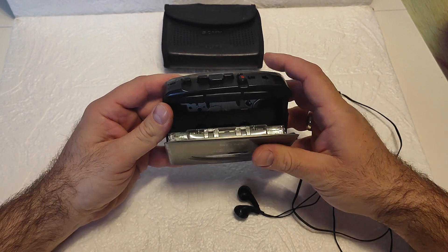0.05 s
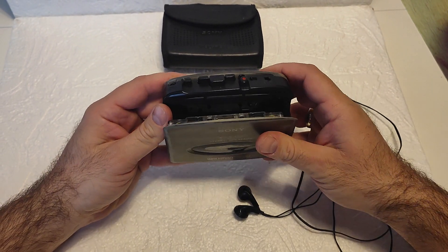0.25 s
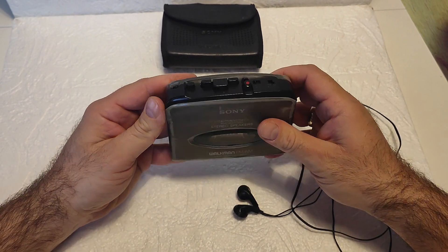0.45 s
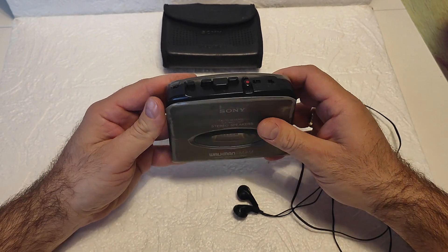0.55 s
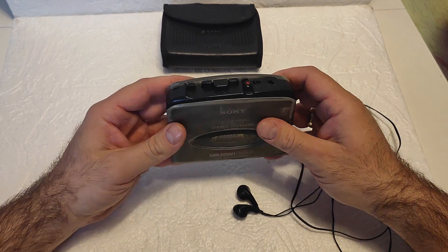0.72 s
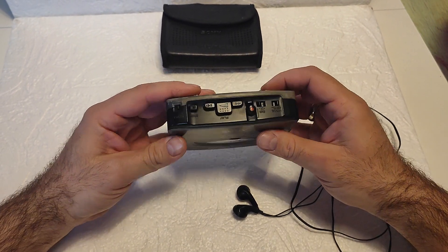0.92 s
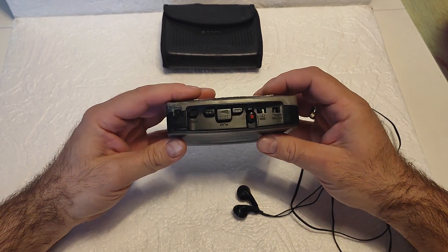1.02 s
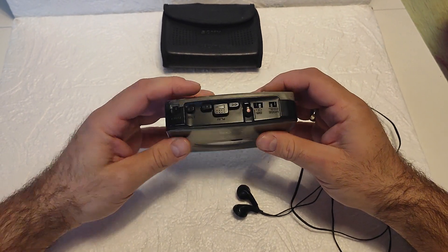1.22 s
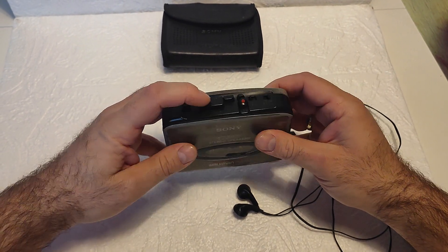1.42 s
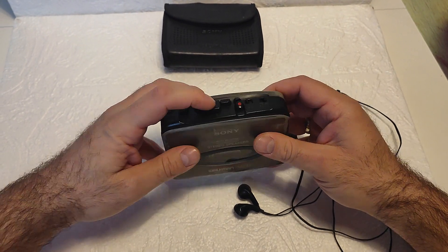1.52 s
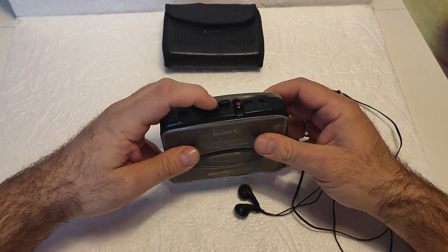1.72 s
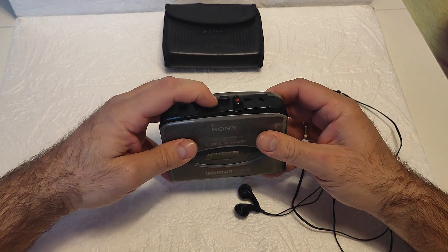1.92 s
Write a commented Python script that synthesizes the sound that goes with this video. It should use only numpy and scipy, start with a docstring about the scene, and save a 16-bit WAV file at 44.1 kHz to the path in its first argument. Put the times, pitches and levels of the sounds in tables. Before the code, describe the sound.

A portable cassette player is closed by hand: a double plastic clack, a short scrape, then a louder latch snap, followed by faint finger rubbing and small taps, close to the microphone in a small room.

```python
"""Closing a cassette player

Hands shut the door of a portable cassette player over a cloth-covered table, close to the microphone.
The cassette knocks into its seat, the door catches and the latch snaps: bursts of noise crack the
plastic shell and fading tones ring its parts. Rough noise makes the scrapes and the finger slides,
and short contacts make the finger taps. A small room answers, over a low steady background."""
import sys
import numpy as np
from scipy import signal
from scipy.fft import rfft, irfft, next_fast_len
from scipy.io import wavfile

SR = 44100
rng = np.random.default_rng(int(sys.argv[2]) if len(sys.argv) > 2 else 0)


def dump_mix(stems):
    """Bounce the given channels to the path in sys.argv[1] as a 16-bit WAV at rate SR."""
    frames = np.atleast_2d(stems).T  # one column per channel
    limited = np.clip(frames, -1, 1)  # hard clip at full scale
    pcm = np.round(limited * 32767).astype(np.int16)
    wavfile.write(sys.argv[1], SR, pcm)


N = 85995  # length in samples


def undb(db):
    """Turn decibels into a gain."""
    return 10 ** (np.asarray(db) / 20)


def along(table, hz):
    """Read a table of (f/Hz, value) points, joined by straight lines on a log-frequency axis."""
    f, v = np.array(table, float).T
    return np.interp(np.log(hz + 1), np.log(f), v)


def shape(x, gain):
    """Filter by a gain given as a function of frequency."""
    size = next_fast_len(2 * x.shape[-1])
    spectrum = rfft(x, size) * gain(np.fft.rfftfreq(size, 1 / SR))
    return irfft(spectrum, size)[..., :x.shape[-1]]


def colour(x, table):
    """Filter to (f/Hz, level/dB) points with minimum phase, so nothing sounds before its cause."""
    size = 4096
    gain = undb(along(table, np.fft.rfftfreq(size, 1 / SR)))
    # folding the cepstrum (the spectrum of the log gain) onto positive times gives minimum phase
    cepstrum = irfft(np.log(gain))
    cepstrum[1:size // 2] *= 2
    cepstrum[size // 2 + 1:] = 0
    response = irfft(np.exp(rfft(cepstrum)))
    return signal.fftconvolve(x, response[None], axes=1)[:, :x.shape[1]]


def on_left(x, table):
    """Colour the left side only."""
    return np.vstack([colour(x[:1], table), x[1:]])


ALIKE_HZ = 1658  # around here the two sides stop being alike


def pair(size):
    """Stereo noise: alike on both sides in the bass, unrelated in the treble."""
    own, shared = rng.standard_normal((2, size))

    def alike(f):
        return 1 / (1 + (f / ALIKE_HZ) ** 2 / 2)

    def unlike(f):
        return np.sqrt(1 - alike(f) ** 2)

    left = shape(shared, alike) + shape(own, unlike)
    return np.array([left, shared])


def flutter(step_s):
    """A random value every step, joined by straight lines."""
    return np.interp(np.arange(N) / SR / step_s, np.arange(N), rng.standard_normal(N))


def ringing(blows, modes):
    """Every blow starts all the modes (natural tones) of a part; each dies at its own rate."""
    out = np.zeros(N)
    for at, db in blows:
        start = int(at * SR)
        t = np.arange(N - start) / SR
        for hz, mode_db, t60 in modes:
            tone = np.cos(2 * np.pi * hz * t)
            decay = np.exp(-np.log(1000) * t / t60)  # falls 60 dB in t60 seconds
            soft_start = (1 - np.exp(-t * hz)) ** 2
            out[start:] += undb(db + mode_db) * tone * decay * soft_start
    return out


# steady background noise: f/Hz, level/dB
BACKGROUND = [(20, -64), (45, -51), (100, -45.5), (140, -48.5), (215, -44), (300, -52), (450, -51.5),
              (1000, -58.5), (2500, -62), (4800, -56.5), (7000, -71), (15000, -66.5)]
# low rumble, unrelated left and right: f/Hz, level/dB
RUMBLE = [(20, -57), (45, -47), (100, -48), (200, -57.5), (600, -84)]
# how the background differs on the left side: f/Hz, level/dB
BACKGROUND_LEFT = [(100, 4.5), (500, 1.5), (1500, -2), (3500, -5.5), (5000, -11), (6400, -23.5),
                   (8500, 3.5), (12000, -1.5)]


def background():
    """Steady noise plus a rumble that is independent on each side; the left side is coloured."""
    steady = colour(pair(N), BACKGROUND)
    rumble = colour(rng.standard_normal((2, N)), RUMBLE)
    return on_left(steady + rumble, BACKGROUND_LEFT)


# tone of the room's answer: f/Hz, level/dB
ROOM = [(100, -26.5), (400, -12.5), (1000, -12), (2000, -5.5), (4000, -17), (6000, -15), (14000, -14.5)]
# time the room takes to fall 60 dB: f/Hz, t60/s
ROOM_T60 = [(200, 0.28), (1000, 0.28), (2200, 0.24), (5000, 0.29), (14000, .28)]
# how much diffuse sound escapes the shadow on the left: f/Hz, level/dB
ROOM_LEFT = [(300, 2), (1500, -2), (3000, 7.5), (5000, 3.5), (12000, 4.5)]
ROOM_DELAY_S, ROOM_BUILD_S = 0.002, 0.019  # wait before the answer, time constant of its growth


def room(x):
    """A diffuse tail that builds quickly and dies at its own rate in each band."""
    size = 32768
    t = np.arange(size) / SR
    noise, tail = pair(size), 0
    build = 1 - np.exp(-np.maximum(t - ROOM_DELAY_S, 0) / ROOM_BUILD_S)
    for hz, t60 in ROOM_T60:
        # full at this band's frequency, fading to nothing at its neighbours
        band = [(f, float(f == hz)) for f, _ in ROOM_T60]
        env = build * np.exp(-np.log(1000) * t / t60)
        band_noise = shape(noise, lambda f: along(band, f))
        tail = tail + band_noise * env / np.linalg.norm(env)
    answer = signal.fftconvolve(x, colour(tail, ROOM), axes=1)[:, :N]
    return on_left(answer, ROOM_LEFT)


# modes of the door's spring: f/Hz, level/dB, t60/s
SPRING = [(735, -71.5, 7.3), (1610, -54, .6), (2535, -71.5, 3.6)]
LATCH_S = .5184  # moment the latch sets the spring off


def spring():
    """The door's spring rings on faintly after the latch."""
    return ringing([(LATCH_S, 0)], SPRING)


# finger slides: start t/s, strongest t/s, end t/s, level/dB before the skin's tone
SLIDES = [(0.014, 0.09, .16, -56.5), (0.865, 0.979, 1.21, -54.5), (1.189, 1.419, 1.517, -44.5),
          (1.548, 1.728, 1.818, -46)]
# tone of skin on the case: f/Hz, level/dB
SKIN = [(300, -20.5), (1200, -28), (2500, -11.5), (4200, 2.5), (5700, 4), (7000, -7.5), (15000, -18)]
SLIDE_SHAPE = 0.79  # power that bends each swell; below 1 makes it fuller
GRIP_DB, GRIP_S = 3, .003  # typical size and spacing of the grip-and-slip changes


def fingers():
    """Skin slides over the case, gripping and slipping, swelling and letting go."""
    t = np.arange(N) / SR
    effort = 0
    for start, strongest, end, db in SLIDES:
        swell = np.interp(t, [start, strongest, end], [0, 1, 0]) ** SLIDE_SHAPE
        effort = effort + undb(db) * swell
    grip = undb(GRIP_DB * flutter(GRIP_S))
    return colour(pair(N) * effort * grip, SKIN)


# plastic scraping as the door is pushed home: start t/s, end t/s, level/dB before the shell's tone
SCRAPES = [(0.197, 0.223, -42.5), (0.243, 0.256, -34.5), (0.459, 0.488, -33.5), (0.48, 0.519, -21.5)]
SCRAPE_ROUGH_DB, SCRAPE_GRAIN_S = -1.5, 0.00087  # size and spacing of the roughness; sign is immaterial
CHATTER_S, CHATTER_DB = 0.0067, -9.5  # decay time constant and starting level of shaken loose parts


def scrapes():
    """Plastic edges stick and slip against each other, a fast random roughness on swelling noise."""
    t = np.arange(N) / SR
    push = 0
    for start, end, db in SCRAPES:
        times = [start, (start + end) / 2, end, end + CHATTER_S]
        push = push + undb(db) * np.interp(t, times, [0, 1, 1, 0])
    roughness = undb(SCRAPE_ROUGH_DB * flutter(SCRAPE_GRAIN_S))
    return pair(N) * push * roughness


# blows that set the cassette ringing as it seats: t/s, level/dB
SEATINGS = [(.2152, -5), (.2694, 3)]
# modes of the cassette: f/Hz, level/dB, t60/s
CASSETTE_MODES = [(394.7, -37, 0.06), (514, -46, 0.073), (780, -41, 0.058), (997, -26, .05),
                  (1144, -33, 0.051), (1335, -29, 0.032), (1780, -35, 0.028), (3620, -30.5, .04),
                  (4110, -23, 0.019), (4040, -26, 0.033), (4300, -23.5, .04), (5110, -28, 0.03)]


def cassette():
    """The cassette rings as it knocks into its seat."""
    return ringing(SEATINGS, CASSETTE_MODES)


# flick of the small catch: t/s, level/dB
FLICKS = [(.4168, -33.5)]
# modes of the catch: f/Hz, level/dB, t60/s
CATCH_MODES = [(3400, -1, 0.021), (4600, -2.5, 0.023)]


def catch():
    """The small catch flicks once and rings high and short."""
    return ringing(FLICKS, CATCH_MODES)


# blows that set the door and case ringing: t/s, level/dB
CLOSINGS = [(.4882, -15.5), (.5184, 1.5)]
# modes of the door and case: f/Hz, level/dB, t60/s
DOOR_MODES = [(248.5, -37.5, 0.041), (512, -33.5, 0.067), (1013, -15, 0.03), (1078, -24.5, 0.081),
              (1412, -25, .04), (1571, -27.5, 0.062), (1768, -21, 0.044), (2154, -25.5, .045),
              (3480, -38, .05), (3620, -21, 0.03), (4560, -15.5, 0.021), (4640, -12, 0.033),
              (5160, -24, .05)]


def door():
    """The door and case ring as the door closes."""
    return ringing(CLOSINGS, DOOR_MODES)


CRACK_S = 0.002  # decay time constant of the contact itself


def crack(t):
    """One contact: a sharp burst with an even spectrum, then brief chatter."""
    env = np.exp(-t / CRACK_S) + undb(CHATTER_DB) * np.exp(-t / CHATTER_S)
    spectrum = rfft(pair(len(t)) * env)
    even = irfft(spectrum / np.abs(spectrum), len(t))  # every frequency equally strong
    fade = np.minimum(1, 2 * np.exp(-t / CHATTER_S / 2))
    return even * fade * np.sqrt(np.sum(env ** 2))


# contacts of cassette, door, latch and fingers, before the shell's tone:
# t/s, level/dB, middle tones level/dB, low thud level/dB, brightness level/dB
CONTACTS = [(0.1854, -40, 11.5, 8, -1), (0.194, -31.5, 4.5, 1.5, -7), (.2140, -8.5, -15, -30, -5.5),
            (0.2144, -2.5, -2.5, -12, -2), (0.2209, -13, 2, -9.5, -9), (0.2373, -25, -11, -1.5, -1),
            (0.2636, -15.5, 3.5, -7, 2), (.2640, -3.5, -3, -16, 2), (0.266, -3.5, -1.5, -3, -2),
            (0.2696, -10.5, -0.5, 0, -7), (.2712, -12, 7.5, -14.5, 2), (0.2823, -15.5, -3, -7, 1),
            (0.407, -51, -4.5, 4.5, 12), (0.4165, -25, -3.5, -7, -11), (0.456, -23.5, 3, -3, -3),
            (0.4662, -29.5, -3, -3, 9), (0.486, -9, -0.5, -8.5, -0.5), (0.4876, -5, -3, -6, 0.5),
            (0.4919, -9, -0.5, 2.5, -3), (.4960, -14.5, 10, -6.5, -6.5), (.5100, -19, 12, 3, 3.5),
            (0.5161, -6.5, 4.5, 16.5, -11.5), (0.5181, 2.5, 4, 7, 1.5), (0.5215, -4, 0, -7.5, -1),
            (0.5284, -19, -2, -10, 2), (.9790, -32, -0.5, 7.5, -4.5), (.9880, -34.5, 3.5, 0, -7),
            (1.0785, -38.5, 9.5, 5.5, -1), (1.2349, -35.5, -1, -4.5, -0.5), (1.4434, -43, -21, -1, -2),
            (1.6322, -39, -8, -9, 4), (1.828, -35.5, -6, -9, 6), (1.8326, -34, -1, -12, 9),
            (1.8345, -32.5, 5.5, -3, 13.5), (1.8420, -45, 2, -10, 7)]
THUD_HZ, TREBLE_HZ = 580, 2550  # borders between thud, middle tones and treble
BRIGHT_HZ = 6500  # the brightness level applies from here up


def contacts():
    """Each contact is a crack with its own balance of thud, middle tones and brightness."""
    size = 4096
    out = np.zeros((2, N + size))
    for at, db, body_db, thud_db, bright_db in CONTACTS:
        weight = [(THUD_HZ / 2, thud_db),
                  (THUD_HZ * np.sqrt(2), body_db),
                  (TREBLE_HZ / np.sqrt(2), body_db),
                  (TREBLE_HZ * np.sqrt(2), 0),
                  (BRIGHT_HZ, bright_db)]
        i = int(at * SR)
        out[:, i:i + size] += undb(db) * colour(crack(np.arange(size) / SR), weight)
    return out[:, :N]


# tone of the cracking plastic shell: f/Hz, level/dB
SHELL = [(30, -62.5), (80, -35), (240, -21.5), (650, -23.5), (1000, -12.5), (1500, -14.5), (2100, -13.5),
         (2700, -13), (3300, -7), (3900, 0), (4600, -0.5), (4950, -7), (5500, -1.5), (6100, -11),
         (7000, -20), (15000, -26.5)]


def case():
    """The shell colours the contacts and scrapes; cassette, door and catch add their ringing."""
    return colour(contacts() + scrapes(), SHELL) + cassette() + door() + catch()


# the left side's shadow over the player, fingers and room: f/Hz, level/dB
LEFT = [(100, 4.5), (1200, 0), (2200, -2), (3200, -11), (4400, -15.5), (5400, -21), (6400, -29),
        (8500, 0.5), (12000, -17)]


def scene():
    """Player and fingers, their room, and the background; the left side hears less treble."""
    near = fingers() + case()
    heard = near + spring() + room(near)  # the spring is heard without the room
    return on_left(heard, LEFT) + background()


# microphone colour: f/Hz, level/dB
MIC = [(6200, -1.5), (7200, -7), (7900, -22.5), (10100, -29), (10600, -8.5), (15500, -5)]
TOP_HZ = 16000  # edge of the top cut


def record(dry):
    """The microphone has a hollow in the upper treble and a steep top cut."""
    top_cut = signal.ellip(10, .2, 70, TOP_HZ, fs=SR, output="sos")  # 0.2 dB ripple, 70 dB cut
    return signal.sosfilt(top_cut, colour(dry, MIC))


dry = scene()
out = record(dry)
dump_mix(out)
```